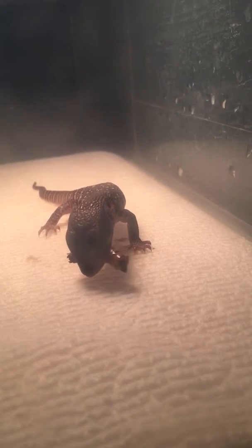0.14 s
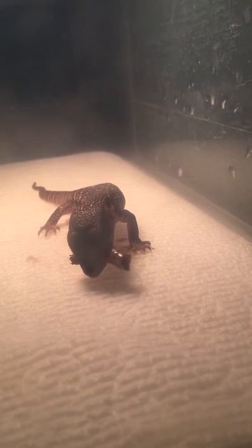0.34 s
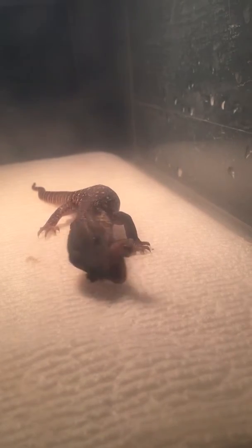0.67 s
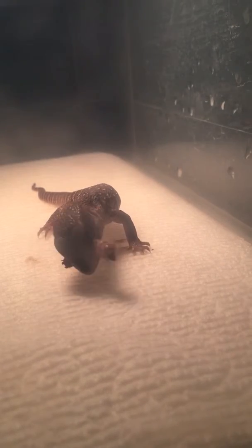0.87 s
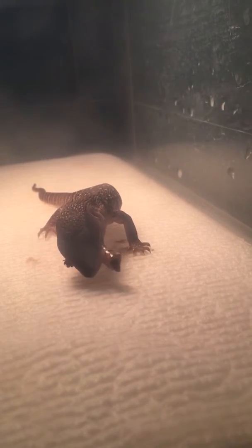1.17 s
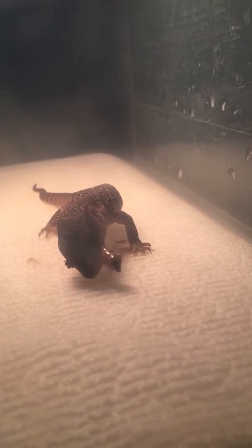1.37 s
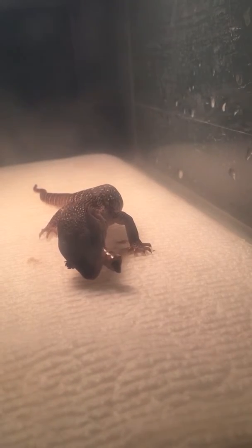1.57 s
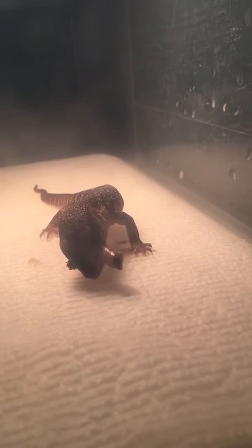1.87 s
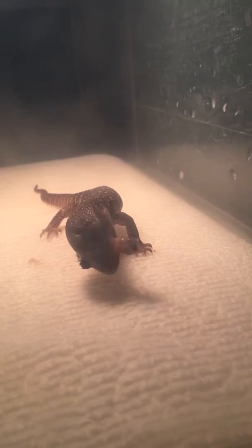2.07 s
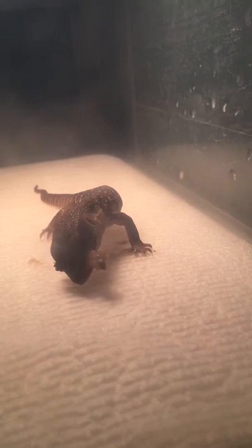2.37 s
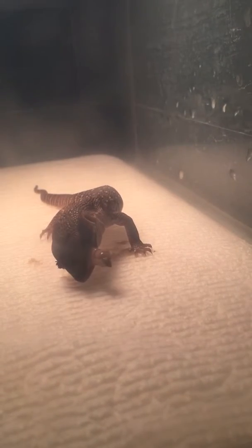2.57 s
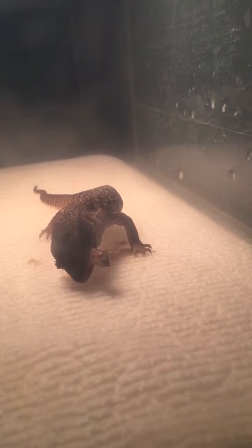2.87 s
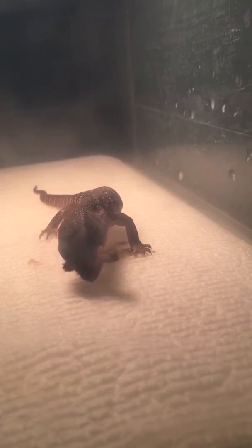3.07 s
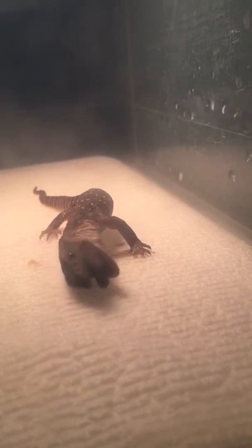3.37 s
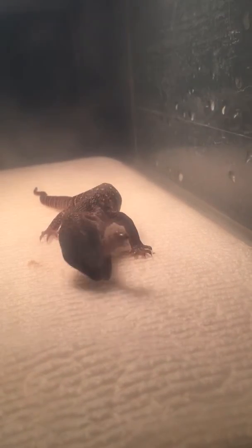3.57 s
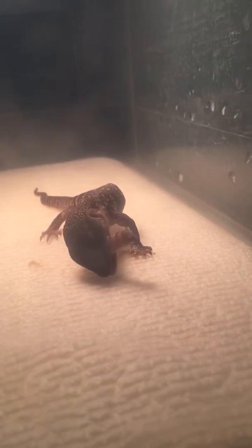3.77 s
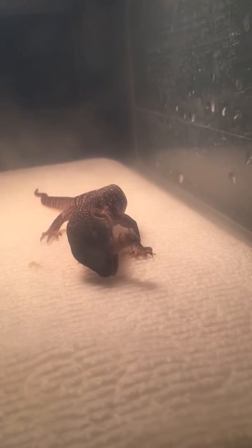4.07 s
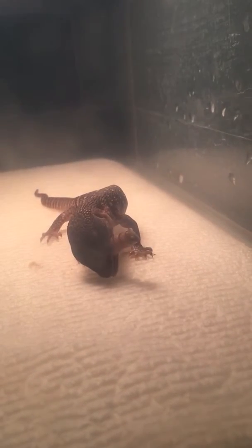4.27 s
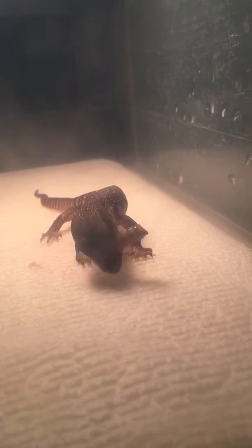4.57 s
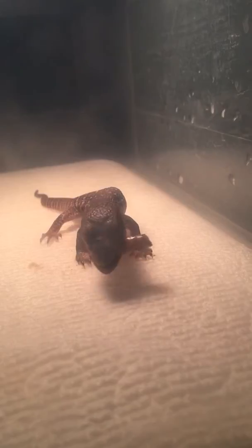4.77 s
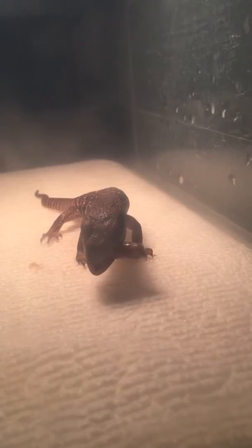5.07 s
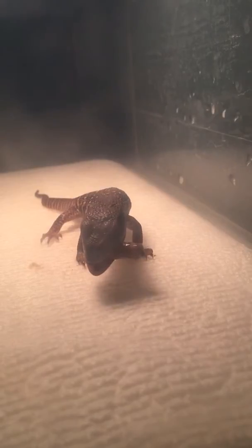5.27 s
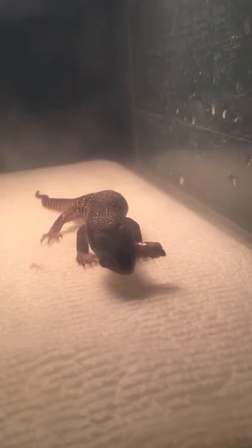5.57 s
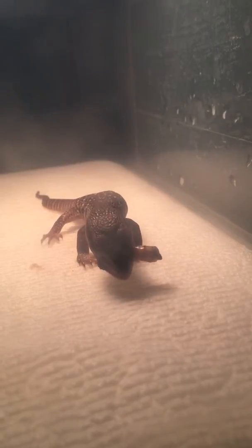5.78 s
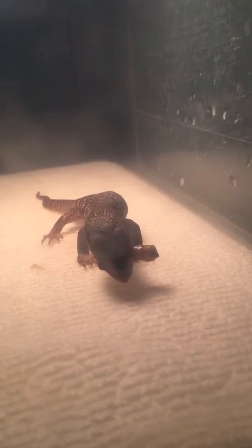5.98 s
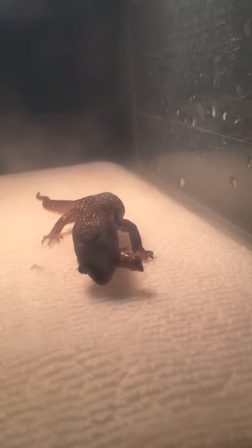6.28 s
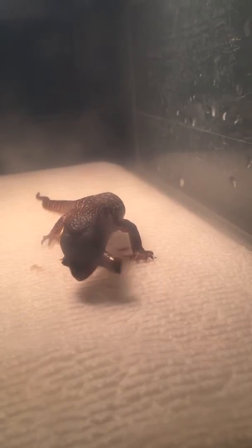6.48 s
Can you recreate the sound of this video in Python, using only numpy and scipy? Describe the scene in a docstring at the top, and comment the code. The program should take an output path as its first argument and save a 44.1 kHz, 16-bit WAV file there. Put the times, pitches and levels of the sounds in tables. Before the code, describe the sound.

Close view of a small lizard chewing a worm in a glass tank. A low, slightly wavering appliance hum with rumble and soft air runs throughout. Faint rustles come first, then a tiny tick, a short wet fizz, a hollow pop and, a fifth of a second later, a louder crisp crunch. Nearby walls echo both briefly. A soft scuff and small snap follow, then only hum with faint deep bumps.

```python
"""A steady hum and air noise of an appliance run all the way through, with faint rustling early on.
In this quiet room a small lizard bites a worm in a glass tank: the skin ticks, squeezes out a fine
wet fizz and bursts in two sharp cracks; a last small snap follows. Nearby walls throw each crack back.
Cracks are coloured steps, fizz and rustles are sprays of tiny random pulses,
and the appliance is a set of wavering tones plus filtered noise."""
import sys
import numpy as np
from scipy import signal
from scipy.fft import rfft, irfft
from scipy.io import wavfile

SR = 44100
rng = np.random.default_rng(int(sys.argv[2]) if len(sys.argv) > 2 else 0)


def inscribe(sig):
    """Save sig as 16-bit PCM at rate SR to the path in sys.argv[1].

    A 1-D sig is mono; a 2-D sig holds one channel per row.
    Samples are clipped to [-1, 1] before scaling.
    """
    pcm = np.round(np.clip(np.atleast_2d(sig).T, -1, 1) * 32767)
    wavfile.write(sys.argv[1], SR, pcm.astype(np.int16))


N = 292905  # length [samples]
TOP_HZ = 15800  # upper edge of the sound

# hollow pops as the skin splits inside the mouth: (time [s], energy [dB])
POPS = [(1.6751, 1.5), (1.6991, -9), (1.7248, -13)]
# their colour, with two mouth resonances: (frequency [Hz], relative level [dB])
POP_COLOUR = [(150, -44), (700, -27), (1250, -16.5), (1600, -10), (2050, 1), (2400, -5), (2850, -19.5),
              (3600, -13.5), (4200, 2), (4900, -7), (6600, -14), (7900, -13.5), (9500, -15), (16000, -21)]
# the full crunch as the jaws close: (time [s], energy [dB])
CRUNCH = [(1.8837, 6.5)]
# its broad colour: (frequency [Hz], relative level [dB])
CRUNCH_COLOUR = [(150, -31.5), (480, -27), (750, -15), (1100, 2), (1330, -13.5), (1650, -4), (2200, 1.5),
                 (3100, -2.5), (4400, -5.5), (4900, -14.5), (7000, -9), (9000, -18.5), (12000, -13.5),
                 (16000, -26)]
# small dry ticks of the skin; deeper in the mouth they have more body:
# (time [s], energy [dB], body boost before levelling [dB])
TICKS = [(1.5812, -21.5, -7), (1.8143, -29.5, -4), (1.8513, -37, 0), (2.0845, -38, 0), (2.6693, -21, 12)]
# their colour before the body is added: (frequency [Hz], relative level [dB])
TICK_COLOUR = [(150, -35), (700, -19), (1500, -10), (2500, -1.5), (3600, 4.5), (5000, -1), (7500, 0.5),
               (9500, -5.5), (11700, -3.5), (16000, -9)]
TICK_BODY_HZ = 2400  # the body lies below this

# colour of the wet fizz: (frequency [Hz], relative level [dB])
FIZZ_COLOUR = [(500, -19), (2000, -16.5), (5000, -13.5), (9000, -8.5), (10500, -13), (12200, 2.5),
               (13700, -11), (15300, -1.5), (16200, -3.5)]
# juice is squeezed out from this moment until the skin first pops, then dies away
SQUEEZE_START_S, SQUEEZE_ATTACK_S, SQUEEZE_DB = 1.606, 0.015, -37.5
SQUEEZE_RISE_DB, SQUEEZE_SAG_DB_PER_S = 25, 50  # swell over the attack; sag while the jaws hold
POP_RELIEF_DB, SQUEEZE_RELEASE_DB_PER_S = 3, 190  # the pop lets the pressure off

# faint rustles: (loudest time [s], level [dB], 20 dB rise [s], 20 dB fall [s])
RUSTLES = [(.06, -63, .13, .14), (.39, -68, .08, .1), (.815, -63, .025, 0.021), (1.878, -50.5, 0.066, .04)]
# colour of the rustles and the steady noise band: (frequency [Hz], relative level [dB])
RUSTLE_COLOUR = [(500, -14), (1500, 1.5), (2300, 5), (4200, 0), (7000, -3.5), (10400, -9), (12000, -6.5),
                 (16000, -18)]
# a steady band of faint filtered noise with short fades
BAND_START_S, BAND_END_S, BAND_FADE_S, BAND_DB = 1.58, 2.3, 0.02, -70.5
# a dull soft scuff as the head swings:
# (loudest time [s], level [dB], 20 dB rise [s], 20 dB fall [s])
SCUFFS = [(2.385, -54.5, .075, 0.033)]
# its colour: (frequency [Hz], relative level [dB])
SCUFF_COLOUR = [(600, -28), (1200, 0), (1550, 5), (2000, -16), (3400, -16), (6000, -44)]
# soft deep bumps: (loudest time [s], level [dB])
BUMPS = [(2.66, -42.5), (3.2, -44.5), (3.92, -45), (4.85, -48), (6.08, -46)]
# their colour: (frequency [Hz], relative level [dB])
BUMP_COLOUR = [(15, -25), (40, -9), (58, 8), (85, -5), (130, -27), (300, -62)]
BUMP_RISE_S, BUMP_FALL_S = 0.11, 0.081  # for 20 dB each

# early reflections from nearby walls: (delay [s], gain of the hard echo)
WALLS = [(.0076, 0.3), (.0095, 0.41), (0.01, 0.17), (0.0177, .15), (0.0232, 0.096)]
# how long the room rings: (frequency [Hz], time to fade by 60 dB [s])
ROOM = [(300, 0.25), (1000, 0.17), (2200, 0.21), (4500, 0.22), (8000, 0.23), (15000, 0.18)]

# steady tones of the appliance: (frequency [Hz], rms level [dB])
HUM = [(59.6, -57), (220.9, -55), (239.9, -60.5), (258.9, -59)]
# its rumble: (frequency [Hz], level [dB per Hz])
RUMBLE = [(10, -102), (26, -87), (34, -77.5), (43, -74), (56, -73), (74, -74), (84, -71), (112, -69.5),
          (150, -77), (182, -83), (205, -74), (232, -82.5), (275, -87.5), (370, -82.5), (460, -102),
          (900, -130)]
# its moving air: (frequency [Hz], level [dB per Hz])
AIR = [(200, -110), (520, -92), (700, -91), (790, -91.5), (1300, -90), (1500, -91), (2300, -96.5),
       (3000, -103), (3600, -101), (4900, -111), (5600, -108), (7000, -109), (9400, -116), (10400, -123),
       (11700, -120), (16000, -125.5)]
# resonances in the air noise: (frequency [Hz], width at half power [Hz], level [dB per Hz])
DUCT = [(615.4, 31, -86.5), (918, 95.4, -81), (1117, 82, -82.5), (1790, 49, -93), (2248, 90, -94)]


def cracks(events, colour, tear_s, count):
    """Each break is a sharp coloured step; tearing holds a few random bands back for an instant."""
    out = np.zeros(N)
    step = causal(colour)
    r = np.exp(-1 / (tear_s * SR))
    for s, db in events:
        crack = step
        # one random frequency in each of equally wide bands
        for hz in TOP_HZ * (np.arange(count) + rng.random(count)) / count:
            poles = np.array([1, -2 * r * np.cos(2 * np.pi * hz / SR), r * r])
            # all-pass filter: spreads in time, keeps the colour
            crack = signal.lfilter(poles[::-1], poles, crack)
        add(out, s, gain_of(db) * unit(crack))
    return out


def skin_pops():
    """The skin splits suddenly and the mouth colours each break."""
    return cracks(POPS, POP_COLOUR, tear_s=0.00062, count=10)


def jaw_crunch():
    """The closing jaws give one break with a broad colour."""
    return cracks(CRUNCH, CRUNCH_COLOUR, tear_s=0.00062, count=12)


def skin_ticks():
    """Small cracks of one basic colour, each with its own amount of body."""
    out = np.zeros(N)
    for s, db, body_db in TICKS:
        colour = [(hz, level + body_db / (1 + (hz / TICK_BODY_HZ) ** 4)) for hz, level in TICK_COLOUR]
        out += cracks([(s, db)], colour, tear_s=0.00069, count=12)
    return out


def squeeze():
    """Strength of the fizz: swells as the jaws press, sags, and is released by the first pop."""
    t = np.arange(N) / SR
    held = t - SQUEEZE_START_S - SQUEEZE_ATTACK_S
    released = t - POPS[0][0]
    attack = SQUEEZE_RISE_DB * np.minimum(held / SQUEEZE_ATTACK_S, 0)
    sag = SQUEEZE_SAG_DB_PER_S * np.maximum(held, 0)
    release = (released > 0) * (POP_RELIEF_DB + SQUEEZE_RELEASE_DB_PER_S * released)
    return gain_of(SQUEEZE_DB + attack - sag - release)


def wet_fizz():
    """Squeezed juice makes a dense spray of tiny pulses."""
    return pulse_spray(squeeze(), FIZZ_COLOUR, grains_per_s=14000)


def noise_band():
    """Strength of the steady faint noise: fades in, holds and fades out."""
    t = np.arange(N) / SR
    nearest_end = np.minimum(t - BAND_START_S, BAND_END_S - t)
    return gain_of(BAND_DB) * np.clip(nearest_end / BAND_FADE_S, 0, 1)


def rustles_and_band():
    """One sparse random noise, shaped by the rustle swells plus a constant faint noise level."""
    return pulse_spray(strokes(RUSTLES) + noise_band(), RUSTLE_COLOUR, grains_per_s=11000)


def head_scuffs():
    """The swinging head scuffs softly: a thinner, duller spray of pulses."""
    return pulse_spray(strokes(SCUFFS), SCUFF_COLOUR, grains_per_s=3400)


def deep_bumps():
    """Short swells of deep noise, each with the same rise and fall."""
    level = strokes([(s, db, BUMP_RISE_S, BUMP_FALL_S) for s, db in BUMPS])
    return level * unit(tint(rng.standard_normal(N), BUMP_COLOUR)) * np.sqrt(N)


def room(x, tail_db=-1.5, build_s=0.0026, scatter=0.77, size=22050):
    """Direct sound, a few hard reflections that scatter a little, and a short diffuse tail."""
    hz, t, z = signal.stft(rng.standard_normal(size), SR, nperseg=256)
    fade = gain_of(-60 * t / read(ROOM, hz)[:, None])
    tail = signal.istft(z * fade, SR, nperseg=256)[1][:size]
    t = np.arange(size) / SR
    response = gain_of(tail_db) * unit(tail * (1 - np.exp(-t / build_s)))
    response[0] += 1  # direct sound
    for delay, gain in WALLS:
        echo = scatter * unit(rng.standard_normal(size) * np.exp(-t / 0.00075))
        echo[0] = 1  # the hard echo, ahead of its scatter
        add(response, delay, gain * echo)
    return signal.fftconvolve(x, response)[:N]


def motor_hum(waver=0.13, wander=0.098):
    """Steady tones whose strength and phase [radians] waver slightly."""
    t = np.arange(N) / SR
    hum = np.zeros(N)
    for f, db in HUM:
        strength = gain_of(db) * np.sqrt(2) * (1 + waver * drift(5.8))
        phase = 2 * np.pi * (f * t + rng.random()) + wander * drift(1.3)
        hum += strength * np.sin(phase)
    return hum


def rumble(lumps_db=1.0):
    """Low noise whose level wanders in lumps."""
    return tint(flat_noise(), RUMBLE) * gain_of(lumps_db * drift(6.6))


def moving_air(swell_db=0.53):
    """Air noise, part of it through a few resonances, swelling gently."""
    hz = np.fft.rfftfreq(N, 1 / SR)
    duct = sum(gain_of(db) * np.exp(-((hz - f) / width) ** 2 * 2 * np.log(2)) for f, width, db in DUCT)
    air = tint(flat_noise(), AIR) + irfft(rfft(flat_noise()) * duct, N)
    return air * gain_of(swell_db * drift(4.2))


def appliance():
    """Motor tones, a lumpy rumble and rushing air run all the way through."""
    return motor_hum() + rumble() + moving_air()


def pulse_spray(level, colour, grains_per_s):
    """A dense spray of tiny random pulses, coloured and shaped by an envelope."""
    pulses = rng.standard_normal(N) * (rng.random(N) < grains_per_s / SR)
    return level * unit(tint(pulses, colour)) * np.sqrt(N)


def strokes(rows):
    """Each stroke swells by 20 dB over its rise time and fades by 20 dB over its fall time."""
    t = np.arange(N) / SR
    level = np.zeros(N)
    for s, db, rise_s, fall_s in rows:
        level += gain_of(db - 20 * np.maximum((s - t) / rise_s, (t - s) / fall_s))
    return level


def drift(rate_hz):
    """Slow random wandering with an rms of one."""
    hz = np.fft.rfftfreq(N, 1 / SR)
    slow = irfft(rfft(rng.standard_normal(N)) * np.exp(-(hz / rate_hz) ** 2), N)
    return unit(slow) * np.sqrt(N)


def flat_noise():
    """Noise equally strong at all frequencies, at 0 dB per Hz."""
    return rng.standard_normal(N) * np.sqrt(SR / 2)


def causal(colour, size=2048):
    """The sharpest pulse that has this spectrum, with nothing before its onset."""
    log_gain = np.log(gain_of(read(colour, abs(np.fft.fftfreq(size, 1 / SR)))))
    # the Hilbert transform finds the phase that puts the energy as early as possible
    return np.fft.ifft(np.exp(np.conj(signal.hilbert(log_gain)))).real[:size // 2]


def tint(x, colour):
    """Filters by a spectrum table."""
    return irfft(rfft(x) * gain_of(read(colour, np.fft.rfftfreq(len(x), 1 / SR))), len(x))


def read(points, hz):
    """A spectrum table joined by straight lines over log frequency."""
    f, value = np.transpose(points)
    return np.interp(np.log(hz + 1), np.log(f + 1), value)


def gain_of(db):
    """Decibels to gain."""
    return 10 ** (np.asarray(db) / 20)


def unit(x):
    """Scales to an energy of one."""
    return x / np.sqrt(np.sum(x ** 2) + 1e-20)


def add(mix, s, sound):
    """Mixes a sound in at time s [s]."""
    part = mix[round(s * SR):][:len(sound)]
    part += sound[:len(part)]


def scene(tick_room=0.65):
    """The bite and its small noises in the room, over the bumps and the appliance."""
    ticks = skin_ticks()
    bite = skin_pops() + jaw_crunch() + wet_fizz()
    soft_noises = rustles_and_band() + head_scuffs()
    in_room = room(bite + soft_noises + tick_room * ticks)
    # the small ticks sound drier than the big cracks
    dry_ticks = (1 - tick_room) * ticks
    return (in_room + dry_ticks + deep_bumps() + appliance())[None]


def record(dry):
    """A low-pass filter takes away the treble above the upper edge."""
    lowpass = signal.firwin(511, TOP_HZ, window=("kaiser", 9), fs=SR)
    return signal.oaconvolve(dry, lowpass[None], "same")


dry = scene()
out = record(dry)
inscribe(out)
```